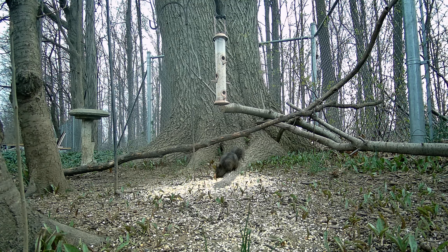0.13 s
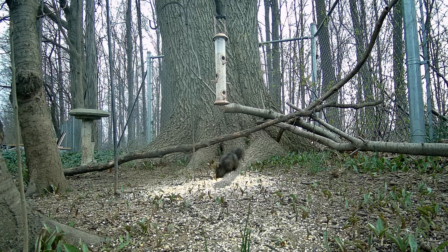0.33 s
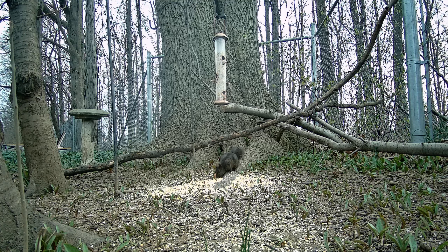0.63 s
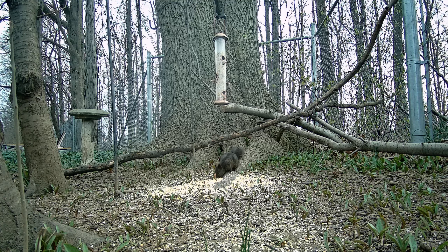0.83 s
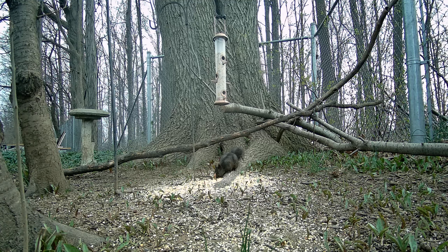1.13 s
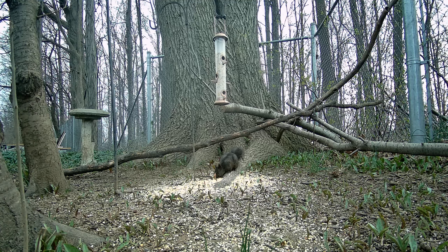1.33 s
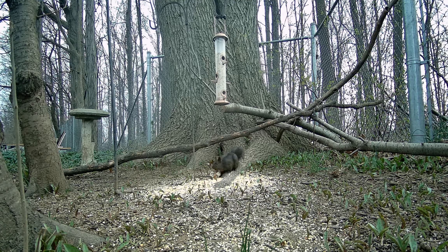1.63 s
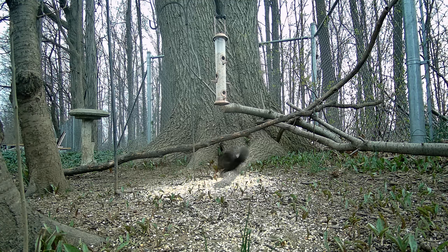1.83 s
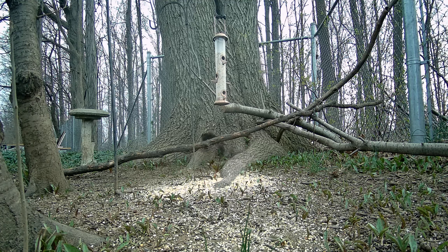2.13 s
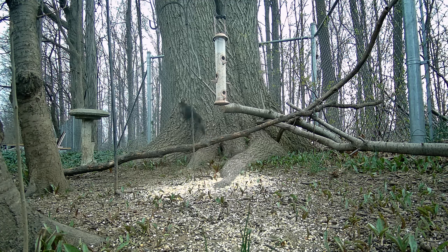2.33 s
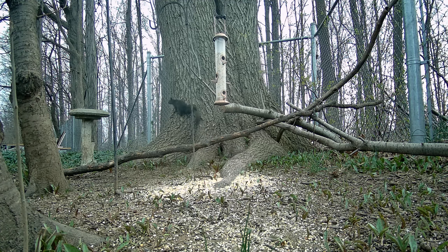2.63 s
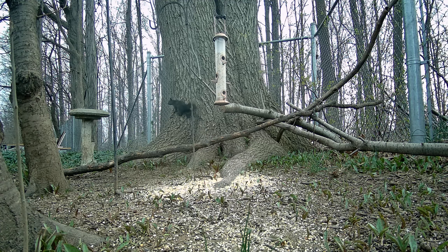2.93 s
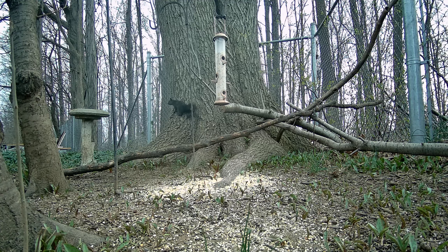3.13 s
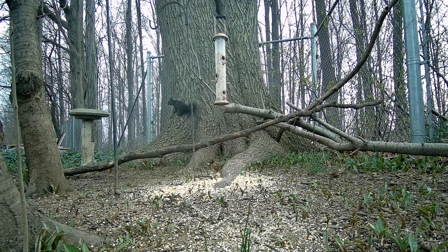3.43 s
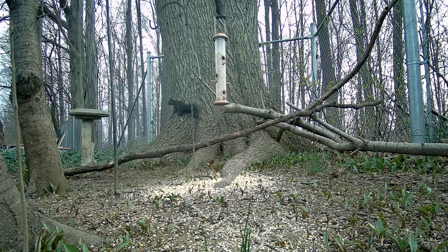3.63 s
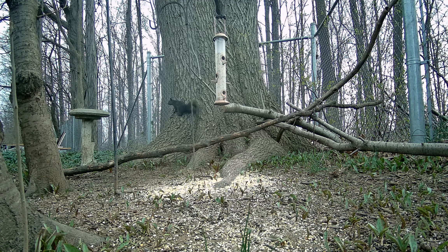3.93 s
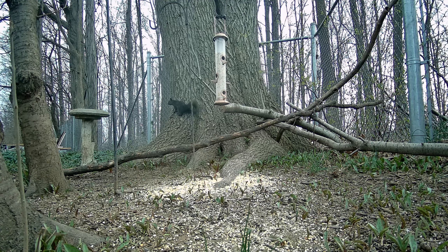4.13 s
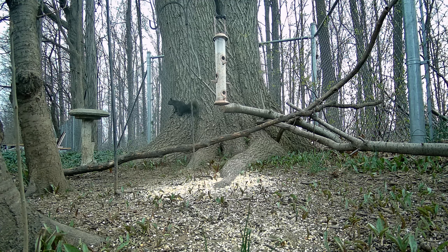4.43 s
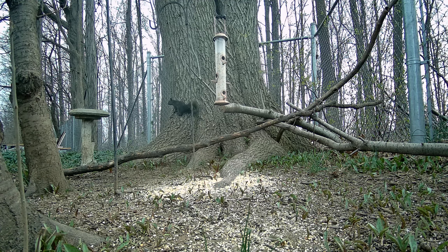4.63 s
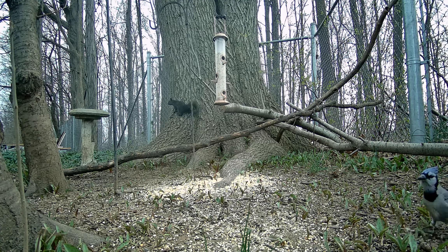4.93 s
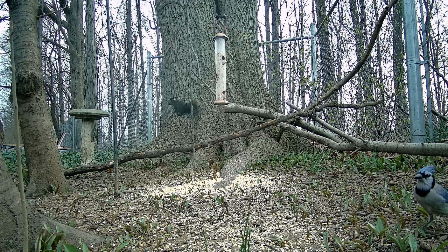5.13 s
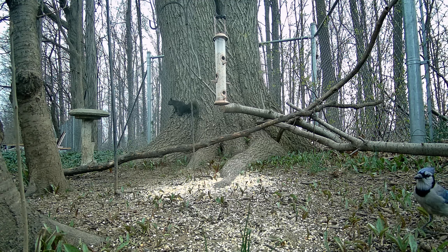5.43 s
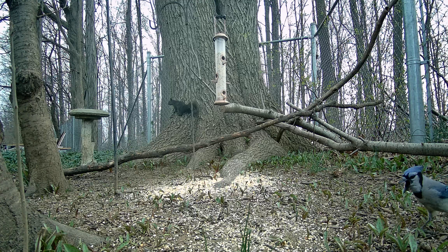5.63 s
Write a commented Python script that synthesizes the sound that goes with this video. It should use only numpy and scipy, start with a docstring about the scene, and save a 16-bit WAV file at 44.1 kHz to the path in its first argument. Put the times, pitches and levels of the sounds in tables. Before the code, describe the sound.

A distant engine throbs throughout, a low, uneven rumble under a soft, even wash of forest air, swelling a little around 3.5 seconds. At about 0.7 seconds a far bird gives one very faint, thin chirp. A blue jay close to the microphone then screams five times, at about 1.5, 2.0, 3.0, 4.1 and 5.7 seconds. Each scream lasts a fifth to a third of a second, scoops up and glides slightly down, with a rough opening, a clearer middle and a harsh close, followed by a short echo from the trees. The first is the quietest, the second raspier, the third and fourth clearer and loud. Between 5.0 and 5.7 seconds dry leaves give a few light, crisp ticks, and the far bird chirps again near 5.5 seconds. The last scream is the loudest, holding a nearly level pitch and distorting as it overloads the microphone.

```python
"""Blue jay at a woodland feeder

A blue jay screams five times close to a trail camera and overloads its 16 kHz sound input.
Each scream is a gliding stack of partials, roughened by irregular vibration; the trees answer it.
A distant engine throbs as its low tones beat under soft forest air.
A far bird chirps twice and dry leaves tick."""
import sys
import numpy as np
from scipy import signal
from scipy.fft import rfft, irfft, next_fast_len
from scipy.io import wavfile
from scipy.ndimage import uniform_filter1d, map_coordinates

SR = 44100
rng = np.random.default_rng(int(sys.argv[2]) if len(sys.argv) > 2 else 0)


def bounce(signal):
    """Save signal as a 16-bit WAV file at the path given by the first command-line argument."""
    frames = np.transpose(np.atleast_2d(signal))
    limited = np.clip(frames, -1, 1)
    pcm = np.round(limited * 32767).astype(np.int16)
    wavfile.write(sys.argv[1], SR, pcm)


N = 254898
T = np.arange(N) / SR


def amp(db):
    """Decibels to gain."""
    return 10 ** (np.asarray(db) / 20)


def unit(x):
    """Scale to rms 1."""
    return x / np.sqrt(np.mean(x ** 2) + 1e-20)


def along(points, hz):
    """Interpolate (Hz, value) points on a log frequency axis."""
    point_hz, values = np.transpose(points)
    return np.interp(np.log(hz + 1), np.log(point_hz + 1), values)


def curves(rows):
    """Each column after the time, interpolated over the scene."""
    times_s, *columns = np.transpose(rows)
    return [np.interp(T, times_s, column) for column in columns]


def wobble(rate_hz, t):
    """Smooth random curve, rate_hz knots a second."""
    knots = rng.standard_normal(2 ** 14)
    return map_coordinates(knots, [t * rate_hz], mode="wrap")


def ramp(x, centre, width):
    """Smooth step from 0 to 1."""
    return (1 + np.tanh(2 * (x - centre) / width)) / 2


def filtered(x, response):
    """Apply a gain given as a function of Hz."""
    size = next_fast_len(N + SR // 2)
    return irfft(rfft(x, size) * response(np.fft.rfftfreq(size, 1 / SR)), size)[:N]


def noise(spectrum):
    """Noise of rms 1, shaped by (Hz, relative dB) points."""
    return unit(filtered(rng.standard_normal(N), lambda hz: amp(along(spectrum, hz))))


# Each row: time in seconds, base level of the tones in dB, lean towards the high tone in dB.
ENGINE_LEVELS = [(0.0, -29.5, 5), (0.12, -22.5, 5.3), (0.45, -30, -8.5), (0.9, -29.5, 0), (1.0, -19.5, -2),
                 (1.15, -27.0, -0.5), (1.6, -28.5, 2), (1.93, -20.5, -8.5), (2.35, -20, -14),
                 (2.8, -21, -4), (3.0, -22.5, 1.5), (3.45, -13, 3), (3.85, -28.5, -0.5), (4.05, -18.5, -3),
                 (4.46, -19, -1.5), (5.15, -22, 0), (5.33, -19, -7), (5.78, -27.5, 10)]
# Each row (low, middle, high tone): offset in dB, dB gained per dB of lean.
TONE_BALANCE = [(-10.5, -0.74), (-6.5, -0.4), (-5.5, 0.45)]
# Each row: time in seconds, pitch of the middle tone in Hz.
MIDDLE_PITCH = [(0, 87.17), (1.9, 84.22), (3.3, 80.92), (4.8, 77.85), (5.8, 79.8)]
# Each row: time in seconds, rumble level in dB.
RUMBLE_LEVELS = [(0, -34), (1.6, -31.5), (2.3, -31), (3.35, -26.5), (3.8, -32.5), (4.35, -30), (4.55, -24),
                 (5.15, -30.5), (5.78, -32)]
# Each row: frequency in Hz, relative density in dB.
RUMBLE_SPECTRUM = [(15, -23.5), (35, -2.5), (60, -21.5), (110, 1), (128, 4.5), (145, -1.5), (163, -1),
                   (190, -4.5), (250, -12.5), (350, -28.5), (700, -58.5)]


def engine(low_hz=58.6, high_hz=98.8, wander_rad=1.0, waver_db=3.0, surge_db=1.5, octave_db=-10.0):
    """Two steady tones and a slowly sinking one between them beat into a throb over a rumble."""
    level_db, lean_db = curves(ENGINE_LEVELS)
    rumble_db, = curves(RUMBLE_LEVELS)
    middle_hz, = curves(MIDDLE_PITCH)
    middle_cycles = np.cumsum(middle_hz) / SR
    tones = []
    for cycles, (offset_db, share) in zip([low_hz * T, middle_cycles, high_hz * T], TONE_BALANCE):
        tones.append((cycles, level_db + offset_db + share * lean_db))
    tones.append((2 * middle_cycles, rumble_db + octave_db))
    out = amp(rumble_db) * noise(RUMBLE_SPECTRUM)
    for cycles, db in tones:
        tone = np.sqrt(2) * np.sin(2 * np.pi * cycles + wander_rad * wobble(9, T))
        out += amp(db + waver_db * wobble(14, T)) * tone
    return out * amp(surge_db * wobble(17, T))


# Each row: frequency in Hz, relative density in dB.
AIR_SPECTRUM = [(160, -29), (280, -4), (301, -3.5), (374, -5), (403, -5.5), (500, -6.5), (832, -5.5),
                (1510, -9.5), (1670, -10.5), (2200, -15), (6730, -42), (7780, -49.5), (9000, -90.5),
                (11700, -100), (19800, -120)]


def air(level_db=-40.0):
    """The soft, even wash of the distance."""
    return amp(level_db) * noise(AIR_SPECTRUM)


# One list per chirp. Each row: time in seconds, pitch in Hz, relative level in dB.
CHIRP_CONTOURS = [
    [(0.7, 3050, -64), (0.75, 3320, -50), (0.767, 4220, -52), (0.795, 3965, -51), (0.81, 3430, -51),
     (0.84, 3106, -52)],
    [(5.45, 3270, -50), (5.485, 3580, -43), (5.51, 3850, -49), (5.54, 3600, -53)],
]


def far_bird(gain_db=-1, echo_send_db=-6, quaver=0.01):
    """Thin arched whistles, softened by their echo."""
    out = np.zeros(N)
    for rows in CHIRP_CONTOURS:
        pitch_hz, level_db = curves(rows)
        pitch_hz *= 1 + quaver * wobble(220, T)
        sounding = (T > rows[0][0]) & (T < rows[-1][0])
        gate = uniform_filter1d(1.0 * sounding, size=400)
        out += gate * amp(level_db) * np.sin(2 * np.pi * np.cumsum(pitch_hz) / SR)
    return amp(gain_db) * (out + amp(echo_send_db) * woods(out))


# Each row: frequency in Hz, time for the far trees' echo to fall 60 dB in seconds.
WOODS_T60 = [(300, 0.17), (1600, 0.24), (2700, 0.53), (3300, 0.5), (4500, 0.32), (6500, 0.33),
             (8500, 0.031)]
# Each row: frequency in Hz, gain of what the trees send back in dB.
SCATTER_GAIN = [(800, -14.5), (1700, -4.5), (2600, -6.5), (3300, -2), (4800, 1.5), (6400, -1.5),
                (8000, 13.5)]


def woods(x, build_s=0.021, near_db=4, near_t60_s=0.13):
    """Scatter from the near trunks dies fast; the farther trees ring on."""
    band_hz, t, spectra = signal.stft(rng.standard_normal(SR), SR, nperseg=256)
    far = amp(-60 * t / along(WOODS_T60, band_hz)[:, None])
    near = amp(near_db - 60 * t / near_t60_s)
    build = 1 - np.exp(-t / build_s)
    _, tail = signal.istft(spectra * (far + near) * build, SR, nperseg=256)
    echo = signal.fftconvolve(x, tail / np.linalg.norm(tail))[:N]
    return filtered(echo, lambda hz: amp(along(SCATTER_GAIN, hz)))


def throat_db(hz, centre_hz, half_width_hz, peak_db):
    """Boost of a partial gliding through one throat resonance."""
    return peak_db * np.exp(-((hz - centre_hz) / half_width_hz) ** 2)


def tightening(age_s, scoop=.21, scoop_s=.0064, settle=.05, settle_s=.014):
    """Pitch ratio rising to 1 as the jay's membranes tighten."""
    fast_rise = 1 - scoop * np.exp(-(age_s / scoop_s) ** 4)
    slow_rise = 1 - settle * np.exp(-age_s / settle_s)
    return fast_rise * slow_rise


def rough_voice(t, pitch_hz, partials, rasp, clear, waver=.005, jitter=.03, skirt_hz=1100,
                drift_rad=.46, slip_rad=1.5, flutter_db=3.0, sway_db=3):
    """Irregular vibration shakes the pitch, slips partials out of step and skirts each with noise."""
    unsteady = 1 + waver * np.sqrt(rasp) * wobble(60, t) + jitter * rasp * wobble(900, t)
    phase = 2 * np.pi * np.cumsum(pitch_hz * unsteady) / SR
    voice = np.zeros(len(t))
    for multiple, db in partials:
        angle = multiple * phase + rng.uniform(0, 2 * np.pi)
        angle += drift_rad * wobble(25, t) + slip_rad * rasp * wobble(180, t)
        skirt = wobble(skirt_hz, t) * np.sin(angle) + wobble(skirt_hz, t) * np.cos(angle)
        flutter = amp(flutter_db * np.sqrt(rasp) * wobble(120, t))
        sway = amp(sway_db * (1 - clear / 2) * wobble(28, t))
        voice += amp(db) * flutter * sway * (np.sin(angle) + rasp * skirt / 2)
    return voice


# Weaker partials. Each row: multiple of the pitch, offset in dB.
WEAK_PARTIALS = [(1, -23), (5, 0.5), (6, 1.5), (9, -9), (10, -8.5)]
# Lines halfway between partials, from cycles alternating strong and weak.
# Each row: number of the partial below, offset in dB.
HALFWAY_LINES = [(2, -13.5), (3, -9.5), (4, -3), (5, -18.5), (7, -9.5)]


def scream(row, hold_s=.045, clearing_s=.015, breaking_s=.0047, release_s=.016,
           opening_rasp=.6, clear_rasp=.06, sag=.15, slack_s=.012, snap_db=6,
           pure_after_s=.158, pure_db=12, clear_boost_db=5.5, harsh_boost_db=3,
           halfway_fade_db_per_s=73.5, hiss_db=-16, shake_db=1.3):
    """One call scoops up and glides down: a rough opening, a clearer middle, a harsh close."""
    start_s, clear_at_s, break_at_s, end_s, attack_s = row[:5]
    top_hz, fall_hz, bend, clarity, closing_rasp = row[5:10]
    second_db, third_db, fourth_db, seventh_db, eighth_db, weak_db, halfway_db, swell_db = row[10:]
    sounding = (T > start_s) & (T < end_s)
    t = T[sounding]
    age_s, length_s = t - start_s, end_s - start_s

    broken = ramp(t, break_at_s, breaking_s)
    clear = clarity * ramp(t, clear_at_s, clearing_s) * (1 - broken)
    edge_rasp = opening_rasp + broken * (closing_rasp - opening_rasp)
    rasp = clear * clear_rasp + (1 - clear) * edge_rasp

    fall = np.clip((age_s - hold_s) / (length_s - hold_s), 0, 1) ** bend
    slack = np.exp((t - end_s) / slack_s)  # the membranes let go at the end
    pitch_hz = (top_hz - fall_hz * fall) * tightening(age_s) * (1 - sag * slack)

    thinning_db = pure_db * clear * ramp(t, clear_at_s + pure_after_s, clearing_s)
    third_db += throat_db(3 * pitch_hz, centre_hz=2600, half_width_hz=32, peak_db=7.8)
    fourth_db += clear_boost_db * clear + snap_db * slack
    seventh_db += throat_db(7 * pitch_hz, centre_hz=5920, half_width_hz=200, peak_db=5.7)
    eighth_db += throat_db(8 * pitch_hz, centre_hz=6420, half_width_hz=480, peak_db=8)
    eighth_db += harsh_boost_db * broken
    halfway_db -= halfway_fade_db_per_s * age_s
    partials = [(2, second_db - thinning_db), (3, third_db), (4, fourth_db),
                (7, seventh_db - thinning_db), (8, eighth_db)]
    partials += [(multiple, weak_db - thinning_db + db) for multiple, db in WEAK_PARTIALS]
    partials += [(below + .5, halfway_db + db) for below, db in HALFWAY_LINES]

    voice = rough_voice(t, pitch_hz, partials, rasp, clear)
    hiss = noise([(700, -34), (1800, -13.5), (3000, -9), (4500, -6.5), (6500, 16.5), (8200, -6)])
    voice += amp(hiss_db) * rasp * np.hypot(amp(fourth_db), amp(eighth_db)) * hiss[sounding]
    envelope = np.clip(age_s / attack_s, 0, 1) * np.clip((end_s - t) / release_s, 0, 1)
    out = np.zeros(N)
    out[sounding] = voice * envelope * amp(swell_db * age_s / length_s + shake_db * wobble(250, t))
    return out


# Each row: start, clearing, break, end and attack in seconds, top pitch and fall in Hz,
# exponent of the fall, clarity 0-1, closing rasp 0-1, base levels in dB (partials 2, 3, 4, 7, 8,
# weak partials, halfway lines), swell in dB, echo send in dB.
JAY_CALLS = [ (1.526, 1.57, 1.735, 1.827, .02, 897.4, 106.5, 1.14, .7, .33, -25.5, -20, -14.5, -27.5, -21.5, -28.5, -15, 7, -18),
             (1.994, 2.027, 2.250, 2.301, 0.0047, 886.3, 100, 1.05, .35, 0.5, -20, -12.5, -6.5, -22, -19, -22, -22, 3, -24),
             (3.034, 3.067, 3.1, 3.258, 0.0049, 888.2, 98, .6, 1, 0.3, -18, -17, -2, -11.5, -17, -15.5, -57.5, -3, -18.5),
             (4.101, 4.115, 4.345, 4.418, 0.0088, 867.4, 112, 1.55, 1, 0.4, -21, -20.5, -1, -13, -14, -15.5, -58.5, -1, -21.5),
             (5.739, 5.753, 5.900, 5.934, 0.0072, 873.3, 20, 1.5, 0.95, 0.44, -3, -4.5, -3, -15, -8, -11, -65, -7, -18.5),
             ]


def jay():
    """Every scream with its echo among the trees."""
    calls = [(scream(row), echo_send_db) for *row, echo_send_db in JAY_CALLS]
    return sum(call + amp(echo_send_db) * woods(call) for call, echo_send_db in calls)


# Each row: time of the peak in seconds, level in dB, half width in seconds.
LEAF_TICKS = [(2.6, -62, .006), (5.02, -43.5, .011), (5.135, -58, .003), (5.305, -59, .003),
              (5.692, -55, .014)]


def leaves(crackle_db=3, echo_send_db=-12):
    """Dry leaves stirred on the ground give short, crisp rustles."""
    envelope = sum(amp(db) * np.exp(-((T - at_s) / width_s) ** 2) for at_s, db, width_s in LEAF_TICKS)
    crisp = noise([(1500, -35), (4000, 0), (6000, 15), (7300, 15.5), (9000, -40)])
    out = envelope * unit(crisp * amp(crackle_db * wobble(750, T)))
    return out + amp(echo_send_db) * woods(out)


def scene():
    """Everything as it reaches the one microphone."""
    return (jay() + engine() + air() + far_bird() + leaves())[None]


def record(dry, input_hz=16000, cutoff_hz=8200, input_limit=0.65, output_limit=0.68, top_hz=15900):
    """The input clips at its low rate, folding overtones down; the overshoot clips again at full rate."""
    common_rate_hz = input_hz * 441
    lowpass = signal.firwin(14113, cutoff_hz, window=("kaiser", 10), fs=common_rate_hz)
    coarse = signal.resample_poly(dry[0], input_hz, SR, window=lowpass)
    coarse = np.clip(coarse, -input_limit, input_limit)
    full = signal.resample_poly(coarse, SR, input_hz, window=lowpass)[:N]
    full = np.clip(full, -output_limit, output_limit)
    return filtered(full, lambda hz: 1 - ramp(hz, top_hz, 150))[None]


dry = scene()
out = record(dry)
bounce(out)
```